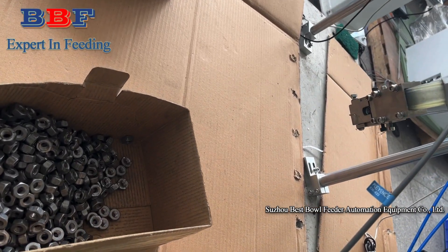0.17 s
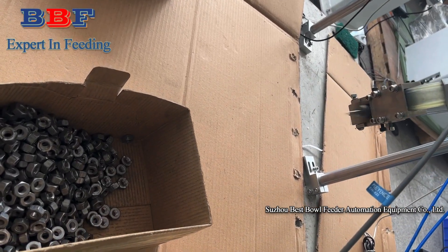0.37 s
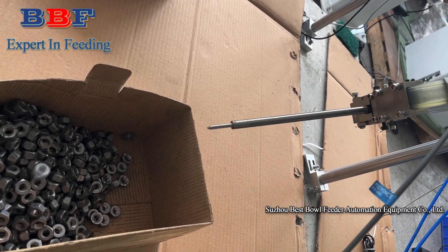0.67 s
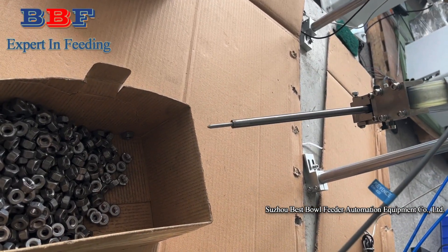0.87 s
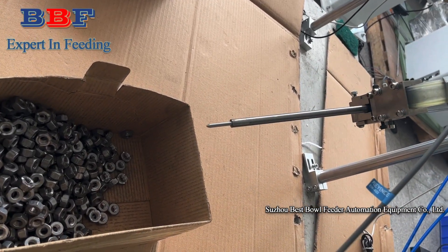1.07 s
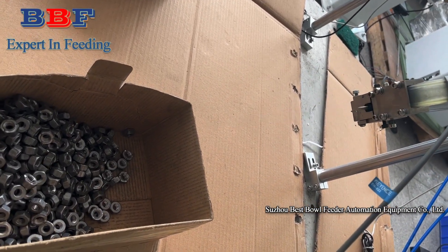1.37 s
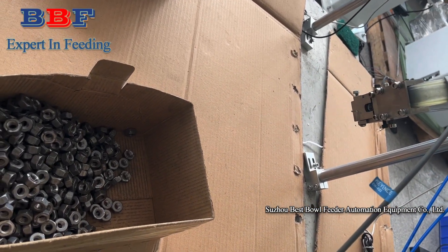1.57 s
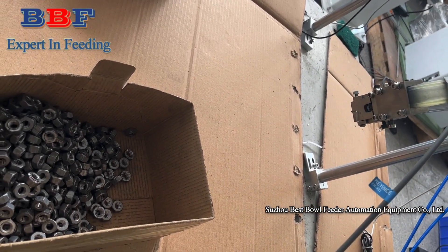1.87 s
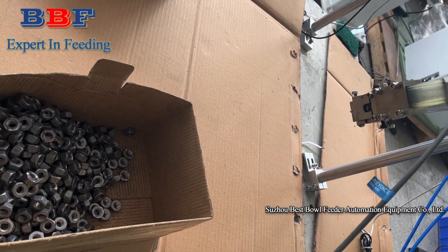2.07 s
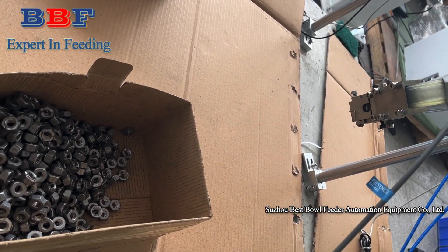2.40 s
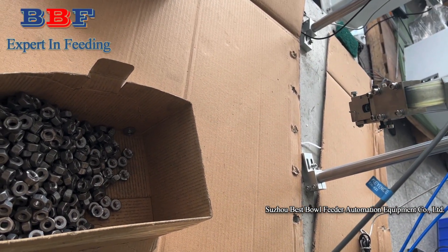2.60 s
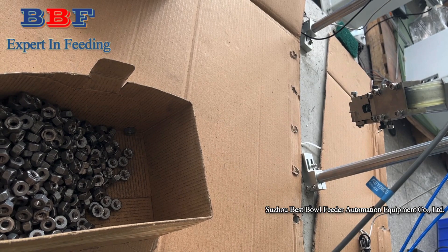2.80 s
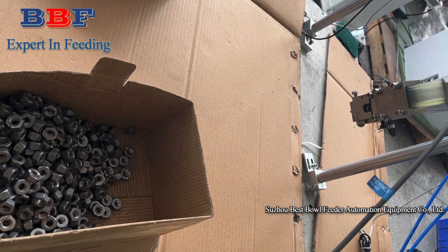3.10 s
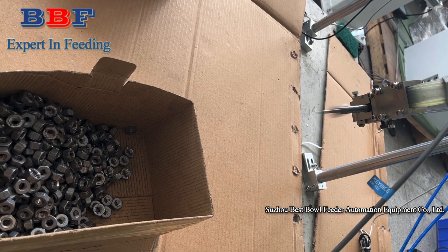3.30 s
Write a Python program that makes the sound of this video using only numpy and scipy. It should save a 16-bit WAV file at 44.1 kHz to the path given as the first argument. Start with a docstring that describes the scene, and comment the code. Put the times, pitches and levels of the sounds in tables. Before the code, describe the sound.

A pneumatic parts feeder works close by over a steady motor hum in a reverberant workshop. Air hisses until 0.4 seconds, with sharp steel ticks and a booming clunk near 0.5. Whistling puffs, ticks and the rod's clunks follow from 0.7 to 1.4. A longer hiss runs from 1.5 to 2.7, with a thud at 1.8. From 3 seconds come two puffs, bright clicks and two clunks.

```python
"""Workshop, close to a pneumatic parts feeder. Air jets hiss through resonant nozzles; valves vent
with a puff and a whistle that falls with the pressure. Small steel parts tick and ring a bracket.
The cylinder hits its end stops, rebounds and booms through the frame. Motors hum behind.
The room reverberates; stereo width, balance and left-right phase vary with frequency."""
import sys
import numpy as np
from scipy import signal
from scipy.fft import rfft, irfft, next_fast_len
from scipy.io import wavfile
from scipy.ndimage import uniform_filter1d, map_coordinates

SR = 44100
rng = np.random.default_rng(int(sys.argv[2]) if len(sys.argv) > 2 else 0)


def generate_wav(signal):
    """Clip the signal to [-1, 1] and save it as 16-bit WAV at the path in sys.argv[1]."""
    frames = np.transpose(np.atleast_2d(signal))
    scaled = np.clip(frames, -1, 1) * 32767
    pcm = np.round(scaled).astype(np.int16)
    wavfile.write(sys.argv[1], SR, pcm)


N = 152145
T = np.arange(N) / SR
BLOW_RISE_S = 0.0025


def amp(db):
    return 10 ** (np.asarray(db) / 20)


def unit_rms(x):
    return x / np.sqrt(np.mean(x ** 2) + 1e-20)


def along(points, hz):
    """Interpolate (f/Hz, value) points on a log axis."""
    f, value = np.transpose(points)
    return np.interp(np.log(hz + 1), np.log(f + 1), value)


def wobble(rate_hz):
    """Smooth random curve with knots at rate_hz."""
    return map_coordinates(rng.standard_normal(int(N * rate_hz / SR) + 4), [T * rate_hz])


def filtered(x, response):
    """Apply response(f/Hz) to x."""
    size = next_fast_len(N + SR // 2)
    return irfft(rfft(x, size) * response(np.fft.rfftfreq(size, 1 / SR)), size)[..., :N]


def band(hz, width_hz, shape=(2, N)):
    """Strands of Gaussian-band noise, rms 1."""
    return unit_rms(filtered(rng.standard_normal(shape), lambda f: np.exp(-((f - hz) / width_hz) ** 2)))


def rush(spectrum, patchy_db, peaks=(), width_hz=1):
    """Two independent strands of coloured noise with patches of random gain, rms 1."""
    bins = signal.stft(rng.standard_normal((2, N)), nperseg=512)[2]
    patches = uniform_filter1d(rng.standard_normal(bins.shape[1:]), size=5, axis=0)
    patches = unit_rms(uniform_filter1d(patches, size=8, axis=1))
    noise = signal.istft(bins * amp(patchy_db * patches), nperseg=512)[1][:, :N]
    boost_db = lambda f: sum(db / (1 + (2 * (f - hz) / width_hz) ** 2) for hz, db in peaks)
    return unit_rms(filtered(noise, lambda f: amp(along(spectrum, f) + boost_db(f))))


def decay(start_s, t60_s, rise_s=0.00063):
    """Envelope: fast rise, exponential fall."""
    t = np.maximum(T - start_s, 0)
    return (1 - np.exp(-t / rise_s)) * amp(-60 * t / t60_s)


def add(out, start_s, x):
    part = out[:, round(start_s * SR):][:, :x.shape[1]]
    part += x[:, :part.shape[1]]


def motors():
    """Wavering motor hum over the noise of other machines."""
    # hum tones: f/Hz, level/dB
    tones = [(80.7, -41.5), (113.0, -39.5), (220.7, -46.5)]
    # machine noise: f/Hz, level/dB
    spectrum = [(60, -0.5), (200, -4.5), (600, -7), (1500, -7.5), (2000, -15.5), (4200, -12), (7000, -20.5),
                (16000, -28.5)]
    hum = sum(amp(db + 6 + 3.8 * wobble(12)) * np.sin(2 * np.pi * hz * T + 0.71 * wobble(9.8))
              for hz, db in tones)
    return hum * [[1], [0]] + amp(-31.5 + 1.5 * wobble(4.53)) * rush(spectrum, patchy_db=1.5)


def air_jets():
    """Each jet opens, fades and shuts, coloured by its nozzle's resonances."""
    # jets: on/s, off/s, level/dB, drift until off/dB, nozzle index
    jets = [(-.1, 0.303, -23, -0.5, 1), (0.306, 0.446, -22, -4.5, 1), (0.938, 1.026, -26, -16, 0),
            (1.542, 2.026, -20, -3, 0), (2.012, 2.7, -20, -1, 1)]
    # air hiss: f/Hz, level/dB
    spectrum = [(300, -65), (900, -4), (2500, -4.5), (10000, 2.5), (16000, -2.5)]
    # resonances per nozzle: f/Hz, boost/dB
    nozzles = [
        [(1170, 13.5), (1990, 9), (3150, 7), (3670, 5.5), (9500, 5)],
        [(1360, 13), (3020, 4), (4550, 7.5)],
    ]
    rise_s, fall_s, widths_hz = 0.006, 0.021, (320, 820)
    gates = np.zeros((2, N))
    for on_s, off_s, db, drift_db, nozzle in jets:
        opening = np.clip(np.minimum((T - on_s) / rise_s, (off_s - T) / fall_s + 1), 0, 1)
        progress = np.clip((T - on_s) / (off_s - on_s), 0, 1)
        gates[int(nozzle)] += amp(db + drift_db * progress) * opening
    return sum(gate * amp(0.68 * wobble(22.5)) * rush(spectrum, 1.5, peaks, width_hz)
               for gate, peaks, width_hz in zip(gates, nozzles, widths_hz))


def valve_vents():
    """A puff of air and a breathy whistle that falls as the pressure drops."""
    # vents: t/s, puff/dB, whistle/dB, start pitch/Hz
    vents = [(.228, -23, -29, 7100), (0.709, -23.5, -22, 6660), (1.423, -25.5, -21.5, 5790),
             (3.010, -24.5, -22.5, 6790), (3.135, -24.5, -27, 7100)]
    # puff: f/Hz, level/dB
    spectrum = [(1500, -2.5), (5500, -0.5), (8000, 4), (12000, -3.5), (16000, -14)]
    end_hz, glide_s, flutter_db = 4200, 0.035, 3
    out = np.zeros((2, N))
    puff = rush(spectrum, patchy_db=1.5)
    breath = band(0, width_hz=500, shape=(2, 2, N))
    for start_s, puff_db, whistle_db, start_hz in vents:
        hz = end_hz + (start_hz - end_hz) * np.exp(-np.maximum(T - start_s, 0) / glide_s)
        phase = 2 * np.pi * np.cumsum(hz) / SR
        whistle = breath[0] * np.cos(phase) + breath[1] * np.sin(phase)
        whistle *= amp(flutter_db * wobble(160))
        out += amp(whistle_db) * whistle * decay(start_s, t60_s=0.18, rise_s=0.0045)
        out += amp(puff_db) * puff * decay(start_s, t60_s=0.43, rise_s=0.0019)
    return out


def part_ticks():
    """Steel parts strike: crack, bright ping, dry clink and a bracket's longer, rough ring."""
    # ticks: t/s, level/dB, ping/Hz, bracket/dB
    ticks = [(0.3166, -11, 13200, -36), (0.351, -9, 8400, -30), (0.5407, -24, 12200, -56),
             (0.788, -19, 15000, -42), (0.8259, -7, 9200, -23.5), (3.087, -17.5, 9400, -28),
             (3.1250, -9, 9260, -30.5), (3.216, -10.5, 14300, -40), (3.2508, -4.5, 8430, -26)]
    crack_t60_s, ping_t60_s = 0.009, 0.008
    out, t = np.zeros((2, N)), T[:SR // 10]
    clink, bracket = band(hz=2860, width_hz=750), band(hz=1499, width_hz=65)
    for start_s, db, ping_hz, bracket_db in ticks:
        crack = np.diff(rng.standard_normal((2, len(t) + 1))) * amp(-60 * t / crack_t60_s)
        ping = np.sin(2 * np.pi * ping_hz * t) * amp(-60 * t / ping_t60_s) * [[1], [0]]
        add(out, start_s, amp(db) * (0.6 * crack + 0.7 * ping))
        out += amp(db - 16.5) * clink * decay(start_s, t60_s=0.16)
        out += amp(bracket_db) * bracket * decay(start_s, t60_s=0.28)
    return out


def stop_ring(modes, t60_s, tilt_db):
    """One blow on an end stop; loose parts make each mode beat and its phase wander."""
    t, hold = T[:SR // 2], 50  # hold: samples per wander step
    steps = rng.standard_normal((len(modes), 2, len(t) // hold))
    walks_rad = 0.03 * np.sqrt(hold) * np.cumsum(steps, axis=2).repeat(hold, axis=2)
    out = 0
    for walk_rad, (hz, db) in zip(walks_rad, modes):
        level_db = db + tilt_db * abs(np.log2(hz / 450)) + 2.3 * rng.standard_normal((2, 1))
        loss_db = 60 * t / t60_s * (hz / 300) ** 0.084  # high modes die sooner
        beat_hz = 24 * (0.5 + rng.random((2, 1)))
        beat = 1 + 0.6 * np.cos(2 * np.pi * beat_hz * t)
        wander_rad = np.sqrt(hz / 900) * uniform_filter1d(walk_rad, size=hold)
        tone = np.sin(2 * np.pi * hz * t + [[0], [np.pi / 2]] + wander_rad)
        out += amp(level_db - loss_db) * beat * tone
    return out * (1 - np.exp(-t / BLOW_RISE_S)) * (1 - (t / t[-1]) ** 2)


def cylinder_clunks():
    """Blow and rebound ring an end stop; a dull thud dies with it and the frame booms."""
    # clunks: t/s, level/dB, tilt/(dB per octave away from 450 Hz), stop (floored), t60/s, boom/dB
    clunks = [(0.361, -32.5, 7, 0, 0.36, -22), (0.4643, -15.5, 3, 0, .4, -10.5),
              (.972, -15, -0.5, 1, 0.39, -16), (1.38, -13.5, -4.5, 0, 0.21, -24),
              (1.535, -25.5, -0.5, 0.97, 0.34, -31), (1.725, -27, 1, 0.12, 0.22, -30),
              (1.809, -10.5, -8, 0.99, 0.21, -17), (3.005, -24, -26, 1, 0.13, -43),
              (3.270, -15, 2.5, 1.5, 0.35, -14.5), (3.3649, -17.5, 3.5, 0, 0.42, -13)]
    # modes per end stop: f/Hz, level/dB
    stops = [
        [(265, -2.5), (495, -1), (813, -6), (1017, -6.5), (1572, -9.5), (1936, -10.5)],
        [(253, -12), (370, -8), (408, -3), (484, -12), (590, -8), (925, -1.5), (1265, -7.5), (1500, -1)],
    ]
    # thud: f/Hz, level/dB
    spectrum = [(60, 2), (150, 8.5), (450, 6), (1600, 5), (2300, -3.5), (4000, -8), (16000, -33)]
    rebound_s, rebound_db, boom_hz = 0.031, -6.5, 113.4
    out, thud = np.zeros((2, N)), rush(spectrum, patchy_db=3.5)
    for start_s, db, tilt_db, stop, t60_s, boom_db in clunks:
        modes = stops[int(stop)]
        add(out, start_s, amp(db) * stop_ring(modes, t60_s, tilt_db))
        add(out, start_s + rebound_s, amp(db + rebound_db) * stop_ring(modes, t60_s, tilt_db))
        out += amp(db - 1 + tilt_db) * thud * decay(start_s, t60_s, BLOW_RISE_S)
        boom = np.sin(2 * np.pi * boom_hz * (T - start_s))
        out[0] += amp(boom_db) * boom * decay(start_s, t60_s=0.36, rise_s=0.0067)
    return out


def reverb(x):
    """Workshop reverberation; the treble dies first."""
    decay_times = [(150, 1), (1500, 0.9), (14000, 0.31)]  # f/Hz, t60/s
    hz, t, bins = signal.stft(rng.standard_normal((2, SR)), SR, nperseg=256)
    tail = signal.istft(bins * amp(-60 * t / along(decay_times, hz)[:, None]), SR, nperseg=256)[1]
    delayed = np.pad(x, ((0, 0), (300, 0)))
    return signal.fftconvolve(delayed, tail / np.linalg.norm(tail[0]), axes=1)[:, :N]


def scene():
    """Feeder, room and motors in two strands: mid and side."""
    feeder = air_jets() + valve_vents() + part_ticks() + cylinder_clunks()
    return feeder + amp(-7) * reverb(feeder) + motors()


def record(dry):
    """Stereo image whose width, balance and left-right phase vary with frequency."""
    # left-right likeness: f/Hz, coherence
    coherence = [(100, 0.97), (300, 0.67), (1400, 0.34), (2000, 0.55), (4800, 0.14), (7000, 1), (16000, 1)]
    # balance: f/Hz, left over right/dB
    balance = [(250, 0.5), (600, 3), (1500, -1.5), (2200, 3), (5000, 2), (8000, 0.5)]
    # right channel's phase lead: f/Hz, lead/half turns
    lead = [(0, 0), (800, -.2), (2000, 0), (4000, -.3), (8250, 1), (12000, 2), (15700, 3)]
    low_hz, top_hz = 51, 15800

    def mid_side_gains(f):
        angle = np.arccos(np.clip(along(coherence, f), 0, 1)) / 2
        return np.array([np.cos(angle), np.sin(angle)])

    def channel_gains(f):
        lead_rad = np.pi * np.interp(f, *np.transpose(lead))
        left = amp(along(balance, f) / 2) * np.exp(-0.5j * lead_rad)
        passband = (f < top_hz) / np.sqrt(1 + (low_hz / (f + 1)) ** 8)
        return np.array([left, 1 / left]) * passband

    mid, side = filtered(dry, mid_side_gains)
    return filtered(np.array([mid + side, mid - side]), channel_gains)


dry = scene()
out = record(dry)
generate_wav(out)
```